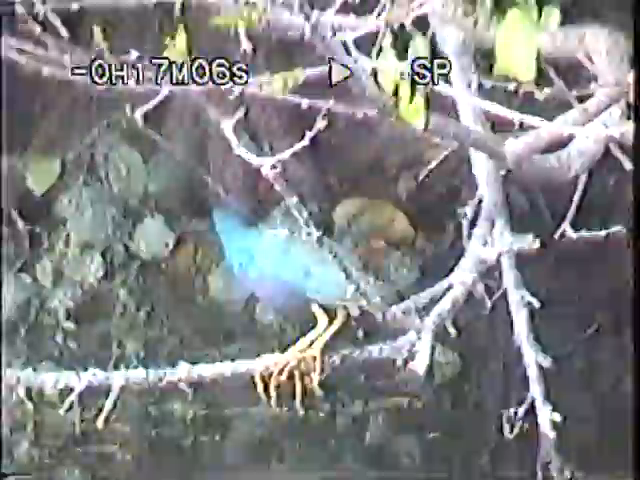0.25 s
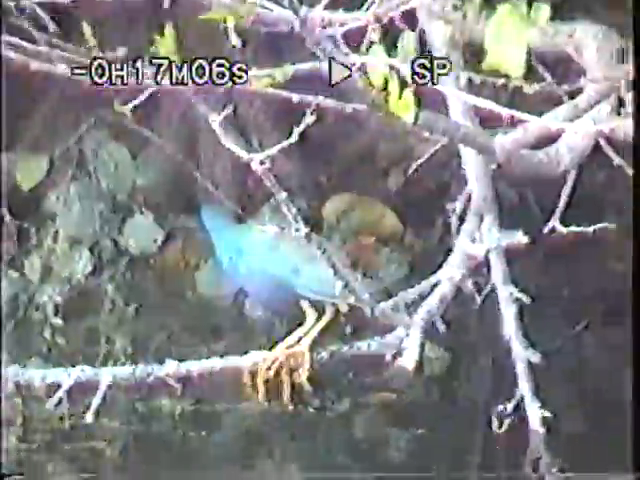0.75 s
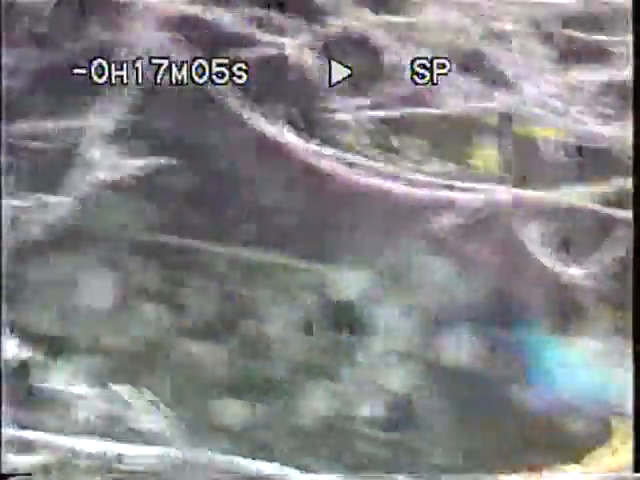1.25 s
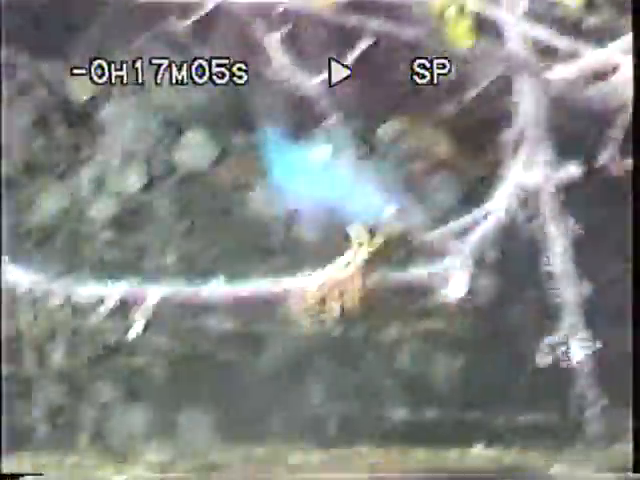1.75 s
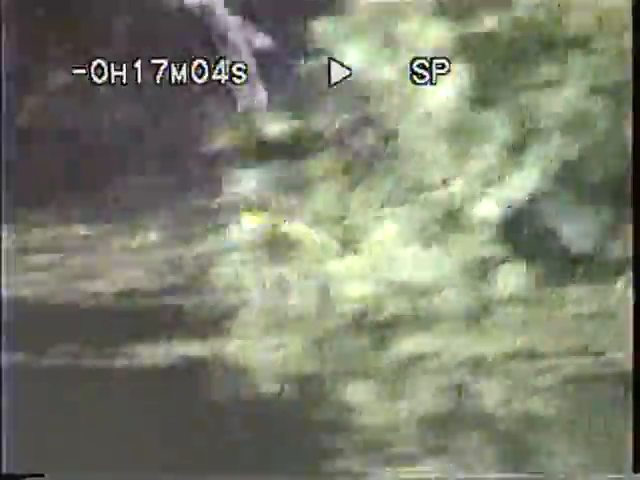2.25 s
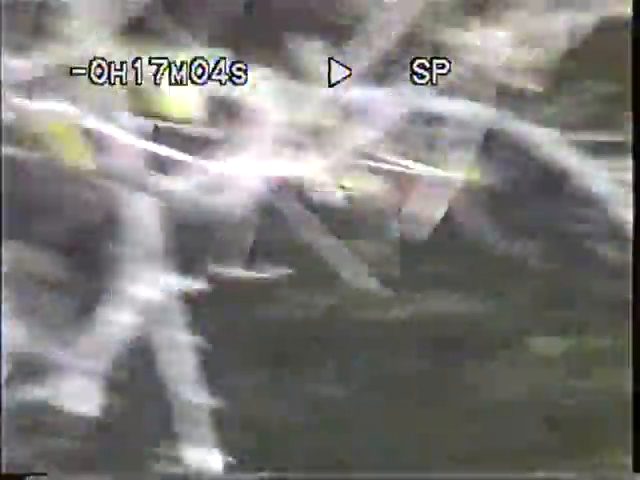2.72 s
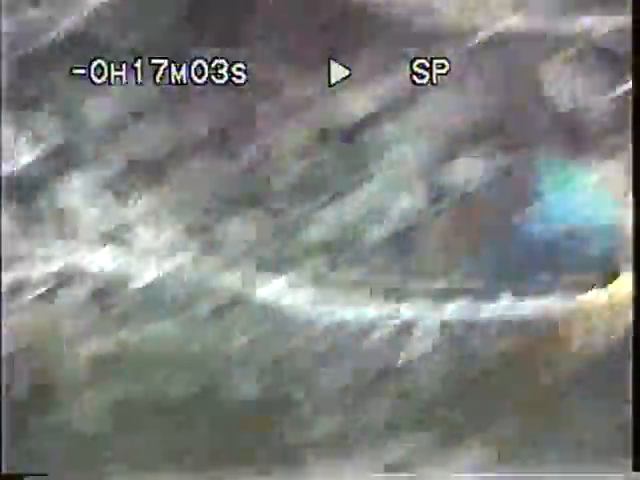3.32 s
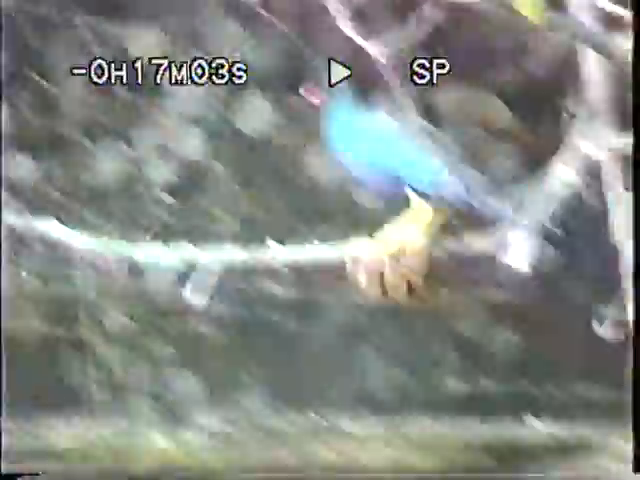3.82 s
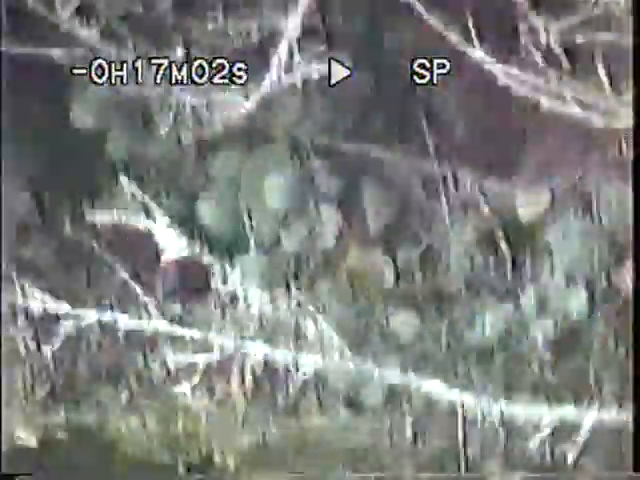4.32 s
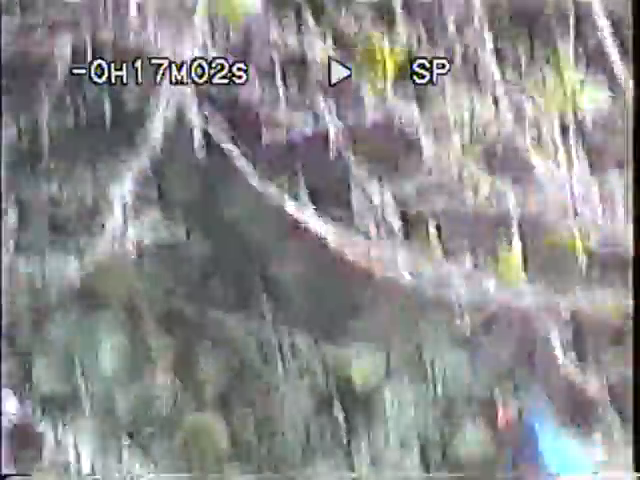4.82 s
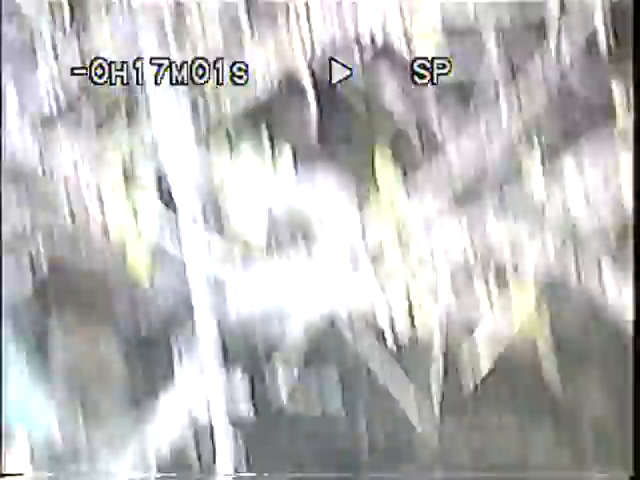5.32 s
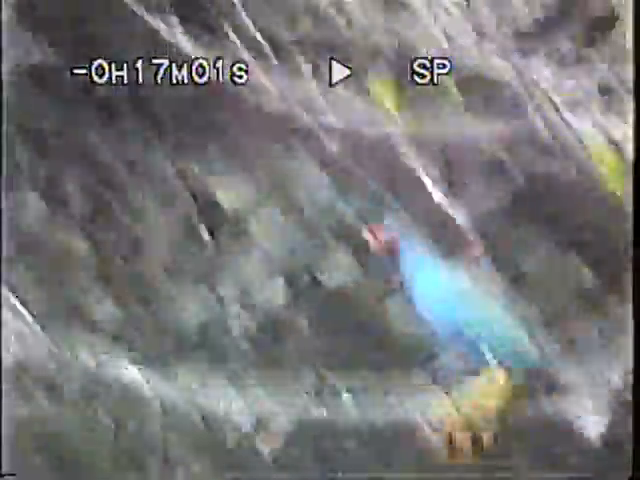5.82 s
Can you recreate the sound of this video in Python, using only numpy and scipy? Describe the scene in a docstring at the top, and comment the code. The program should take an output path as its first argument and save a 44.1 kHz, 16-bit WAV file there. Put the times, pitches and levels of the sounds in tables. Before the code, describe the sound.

Outdoors by a wooded bank, a marsh bird fires eight sharp, raspy chips about four a second, growing louder. After a short gap with low wind thumps, slower clear notes hook downward at the end, a few dry twig ticks around them. Thin falling whistles and faint peeps finish over steady soft hiss. Echoes trail each call; a camcorder microphone puts nearly everything in the left channel.

```python
"""A run of sharp two-voiced notes from a purple gallinule on a branch over water opens over steady outdoor hiss.
Each is two syrinx tones modulating each other; slower hooked notes and thin falling whistles are gliding harmonics.
Faint peeps are short tones, twig ticks are resonant noise bursts, and a wooded bank echoes them all with a noise tail.
Wind puffs are coloured noise that swells and fades; nearly all the sound is in the left channel."""
import sys
import numpy as np
from scipy import signal
from scipy.fft import rfft, irfft, next_fast_len
from scipy.io import wavfile
from scipy.ndimage import map_coordinates

SR = 44100
rng = np.random.default_rng(int(sys.argv[2]) if len(sys.argv) > 2 else 0)


def waveform_to_disk(signal):
    """Save audio, clipped to [-1, 1], as 16-bit WAV at the path in sys.argv[1]."""
    frames = np.transpose(np.atleast_2d(signal))
    scaled = np.clip(frames, -1, 1) * 32767
    samples = np.round(scaled).astype(np.int16)
    wavfile.write(sys.argv[1], SR, samples)


N = 267466  # length [samples]
LEAD = SR // 4  # room before time zero [samples]

# Levels throughout are relative, ahead of the channel gains in scene().
# Upper voice of a sharp note, before its pitch and length factors:
# (time from the accent [s], frequency [Hz], level [dB])
SHARP_UPPER = [(-.060, 3200, -26), (-.053, 3800, -16), (-.037, 3880, -11), (-.029, 4170, -8),
               (-.016, 3150, -11), (-.008, 3270, -7.5), (-.004, 2800, -12), (.001, 2660, 0),
               (.012, 2460, -5), (.019, 2250, -22)]


def amp(db):
    """Logarithmic level: decibels become an amplitude ratio."""
    return 10 ** (np.asarray(db) / 20)


def unit(x):
    """Power normalisation: scale to rms 1."""
    return x / np.sqrt(np.mean(x ** 2) + 1e-20)


def joined(rows, at):
    """Linear interpolation: each later column of a table, read along the first."""
    knots, *columns = np.transpose(rows)
    return [np.interp(at, knots, column) for column in columns]


def wobble(rate, size):
    """Band-limited randomness: a smooth curve through random knots, rate of them a second."""
    knots = rng.standard_normal(int(size * rate / SR) + 4)
    return map_coordinates(knots, [np.arange(size) * rate / SR])


def filtered(x, response):
    """Linear filtering: the spectrum is multiplied by a response of frequency."""
    size = x.shape[-1]
    padded = next_fast_len(size + 8192)
    spectrum = rfft(x, padded) * response(np.fft.rfftfreq(padded, 1 / SR))
    return irfft(spectrum, padded)[..., :size]


def coloured(x, points):
    """Spectral shaping: gains (frequency [Hz], level [dB]) joined along log frequency."""
    knots_hz, db = np.transpose(points)
    return filtered(x, lambda hz: amp(np.interp(np.log(hz + 1), np.log(knots_hz), db)))


def add(track, s, sound):
    """Superposition: mix a sound at s seconds into a track that begins LEAD samples before time zero."""
    part = track[LEAD + round(s * SR):][:len(sound)]
    part += sound[:len(part)]


def outdoors(direct, sent):
    """Reflection and scattering: direct sound plus a bank echo, strongest about a tenth of a second later."""
    # Scattered echo of the branches and bank: (delay [s], level before normalising [dB])
    bank_tail = [(0, -44), (.008, -3.5), (.03, -6), (.075, -3.5), (.102, -3), (.13, -2.5), (.17, -10),
                 (.25, -13.5), (.5, -19.5), (.9, -44.5)]
    # Colour of the echo: (frequency [Hz], level [dB])
    bank_colour = [(1000, -15.5), (2600, -0.5), (4000, 1), (5700, 5), (8500, 3.5), (10000, 2.5), (13000, 1)]
    t = np.arange(SR) / SR
    tail = unit(amp(joined(bank_tail, t)[0]) * rng.standard_normal(SR)) / np.sqrt(SR)
    tail[round(.104 * SR)] += amp(-10.5)  # the bank's face returns one clear copy
    echo = signal.fftconvolve(coloured(sent, bank_colour), tail)[:len(sent)]
    return (direct + amp(-0.5) * echo)[LEAD:]


def voice(hz, jitter, rate):
    """Phase accumulation: a syrinx membrane whose frequency trembles randomly."""
    trembling_hz = hz * (1 + jitter * wobble(rate, len(hz)))
    return 2 * np.pi * np.cumsum(trembling_hz) / SR


def sharp_note(pitch, length, rasp_db):
    """Nonlinear coupling: both syrinx sides sound and form sum tones, then the upper falls to a purer accent."""
    # Time from the accent before stretching by length; the settings below are on this clock too
    t = np.arange(SHARP_UPPER[0][0], SHARP_UPPER[-1][0], 1 / (SR * length))
    rasp = np.clip(-t / 0.0041, 0, 1)  # the strained part before the accent

    upper_hz, upper_db = joined(SHARP_UPPER, t)
    upper_phase = voice(pitch * upper_hz, jitter=0.02841, rate=420)
    upper_gain = amp(upper_db + rasp * rasp_db + 2.75 * wobble(284.6, len(t)))

    # The lower voice warbles about one pitch: 52 swings a second
    lower_hz = 2405 * (1 + 0.0666 * np.cos(2 * np.pi * 52 * t))
    lower_phase = voice(pitch * lower_hz, jitter=0.0406, rate=429.2)
    hold_start, hold_end = -0.0378, -0.0165  # [s]
    rise, fall = 700, 800  # [dB/s]
    lower_db = -12 - rise * np.maximum(hold_start - t, 0) - fall * np.maximum(t - hold_end, 0)
    lower_gain = amp(lower_db + rasp * rasp_db + 4.07 * wobble(277.4, len(t)))

    overtones = amp(-22.5 + 9.33 * rasp) * np.sin(2 * upper_phase)
    overtones += amp(-42.5 + 19.95 * rasp) * np.sin(3 * upper_phase)
    overtones += amp(-49.5) * np.sin(4 * upper_phase)
    sum_tones = amp(-12) * np.sin(upper_phase + lower_phase)
    sum_tones += amp(-17.5) * np.sin(2 * lower_phase)  # the lower voice's own octave
    sum_tones += amp(-22.5) * np.sin(2 * upper_phase + lower_phase)
    hiss_colour = [(1600, 3.5), (2300, 9.5), (3100, 20), (4200, -13.5), (9000, -7.5), (14000, -20.5)]
    hiss = unit(coloured(rng.standard_normal(len(t)), hiss_colour))
    upper = upper_gain * (np.sin(upper_phase) + overtones + amp(-18 + 8.68 * rasp) * hiss)
    return upper + lower_gain * (np.sin(lower_phase) + sum_tones)


def sharp_run():
    """Scattering: branches smear each note of the fast run; its echo keeps its strength as the direct sound grows."""
    # Sharp notes: (time of the accent [s], level [dB], pitch factor, length factor, rasp [dB])
    sharp_table = [(-.045, -25, 0.981, 0.814, -2), (.236, -21, 0.966, 1.072, -2),
                   (.502, -20.5, 0.974, 1.097, -1), (0.783, -21, 0.977, 1.119, -1),
                   (1.039, -19.5, 0.9834, 1.061, 0.5), (1.318, -18.5, 1.01, 1.01, -1.5),
                   (1.592, -15, 0.9794, 1.027, -2), (1.918, -14.5, 0.984, 1.071, -2.5)]
    # Colour of the throat: (frequency [Hz], level [dB])
    throat = [(1800, -5), (2600, -3.5), (3900, -7.5), (5200, -1), (5900, -14), (6600, 1.5), (7300, -4.5),
              (8300, -3.5), (10000, -0.5), (11300, -17), (13000, 3.5)]
    direct, sent = np.zeros((2, LEAD + N))
    t = np.arange(SR // 25) / SR
    smear = np.minimum(t / 0.00164, 1) * amp(-60 * t / 0.288)  # quick rise, then decay
    for accent_s, db, pitch, length, rasp_db in sharp_table:
        note = sharp_note(pitch, length, rasp_db)
        start = accent_s + SHARP_UPPER[0][0] * length
        branches = unit(smear * rng.standard_normal(len(t))) / np.sqrt(len(t))
        add(direct, start, amp(db) * note)
        add(direct, start, amp(db - 6) * signal.fftconvolve(note, branches))
        add(sent, start, amp(-22.5) * note)
    return outdoors(coloured(direct, throat), coloured(sent, throat))


def wind():
    """Turbulent pressure: lumpy puffs on the microphone over a light breeze; harder ones take a second spectrum."""
    # Wind puffs: (time of the crest [s], level [dB], length [s])
    puffs = [(.47, -36, 0.101), (0.606, -37.5, 0.122), (0.746, -38.5, 0.055), (0.905, -33.5, 0.156),
             (1.126, -42.5, 0.098), (1.362, -37.5, 0.128), (1.592, -35, 0.1114), (2.042, -41.5, 0.095),
             (2.15, -32, 0.0514), (2.417, -38.5, 0.077), (2.57, -30, 0.086), (2.654, -30, 0.0438),
             (2.724, -25, 0.0747), (2.906, -32.5, 0.0637), (3.022, -42, 0.18), (5.576, -47.5, 0.18),
             (5.953, -43.5, 0.085)]
    # Spectrum of light puffs: (frequency [Hz], level per Hz [dB])
    light_colour = [(15, -45.5), (25, -8.5), (92, 2), (210, -9), (382, -31), (600, -31), (780, -58),
                    (1320, -120)]
    # Spectrum of the hardest puff: (frequency [Hz], level per Hz [dB])
    hard_colour = [(15, -49), (25, -22.5), (54, -11.5), (160, 0.5), (200, -1), (233, 3.5), (700, -29),
                   (910, -30), (1540, -120)]
    edge_db, sharpness, breeze_db = 5.5, 1.47, -54  # drop half a length from the crest; flank power; floor
    t = np.arange(N) / SR
    swells = [db - edge_db * np.abs(2 * (t - s) / length) ** sharpness for s, db, length in puffs]
    level_db = np.maximum(np.max(swells, axis=0), breeze_db)
    force = np.clip((level_db + 35.5) / 10, 0, 1)  # 0 light, 1 hard
    light = unit(coloured(rng.standard_normal(N), light_colour))
    hard = unit(coloured(rng.standard_normal(N), hard_colour))
    lumps = unit(amp(2.02 * wobble(45, N)))
    return amp(level_db) * lumps * (np.sqrt(1 - force) * light + np.sqrt(force) * hard)


def air():
    """Stationary noise: the steady hiss of the wetland, gently swaying."""
    # Spectrum of the hiss: (frequency [Hz], level per Hz before normalising [dB])
    air_colour = [(15, -34), (25, -10.5), (118, -3), (201, 0), (230, 1), (527, -2.5), (602, -2), (975, -1),
                  (2290, -9.5), (2770, -9.5), (3430, -9), (4240, -12), (6870, -19.5), (13000, -30.5),
                  (14900, -28)]
    return amp(-44.5 + 0.4 * wobble(2.993, N)) * unit(coloured(rng.standard_normal(N), air_colour))


def slur(shape, overtones, length, hz, bright_db, jitter, flutter_db, pace=1):
    """Harmonic synthesis: a clear gliding note whose weak overtones grow as the voice settles."""
    u = np.linspace(0, 1, int(length * SR))  # share of the length
    pitch, db = joined(shape, u ** pace)
    phase = voice(hz * pitch, jitter, rate=415.6)
    settle_db = np.interp(u, [0, .2], [-9, 0])
    upper = sum(amp(level + 2.5 * wobble(60.8, len(u))) * np.sin(k * phase) for k, level in overtones)
    gain = amp(db + flutter_db * wobble(141.9, len(u)))
    return gain * (np.sin(phase) + amp(bright_db + settle_db) * upper)


def peeps():
    """Simple tones: soft, nearly level peeps from far across the marsh, without overtones."""
    # Distant peeps: (time [s], level [dB], reference pitch [Hz])
    peep_table = [(2.419, -42, 2744), (2.575, -41.5, 2735), (4.991, -41, 2766), (5.14, -43.5, 2720),
                  (5.959, -41.5, 2680)]
    # One peep: (share of its length, pitch factor, level [dB])
    peep_shape = [(0, 1.03, -14), (.5, 1, 2), (1, .97, -22.5)]
    track = np.zeros(LEAD + N)
    for s, db, hz in peep_table:
        note = slur(peep_shape, [], 0.0611, hz, 0, jitter=0.0227, flutter_db=-2.0)
        add(track, s, amp(db) * note)
    return outdoors(track, amp(-6.5) * track)


def hooked_notes():
    """Frequency glide: slower clear notes level off and drop at the end; the bank hears all about equally."""
    # Hooked notes: (time [s], length [s], level [dB], plateau pitch [Hz], overtone level [dB],
    # glide pace: 1 even, less settles sooner)
    hooked_table = [(2.657, 0.107, -25, 2881, 0.5, 0.851), (2.927, 0.1205, -24, 2844, -1.5, 0.953),
                    (3.195, 0.1114, -25, 2766, -.5, 1.005), (3.438, 0.1174, -23, 2744, -3, 1.138),
                    (3.71, .12, -21.5, 2778, 0, 1.1), (3.969, 0.1137, -23.5, 2745, -3, 0.977),
                    (4.273, 0.1027, -32.5, 2788, 2, 0.9)]
    # One hooked note: (share of its length, pitch factor, level [dB])
    hook_shape = [(0, 1.27, -22), (.13, 1.155, -11), (.3, 1.06, -5), (.48, 1.014, -2), (.66, .998, 0),
                  (.87, 1.0, 0), (.94, .95, -2), (1, .83, -11)]
    # Overtones, the halves from a slight rasp: (multiple of the pitch, level [dB])
    hook_overtones = [(1.5, -35), (2, -28.5), (2.5, -40), (3, -28.5), (4, -55)]
    # Colour of the throat: (frequency [Hz], level [dB])
    throat = [(2800, -2), (3500, 3.5), (5200, 4.5), (5900, 9), (6600, 12), (8400, -4), (9200, 8),
              (10000, -10.5), (14000, -12.5)]
    sent_colour = [(2700, 0.5), (3200, 7.5), (5600, -6.5), (8400, 5.5), (10000, 5.0)]
    direct, sent = np.zeros((2, LEAD + N))
    for s, length, db, hz, bright_db, pace in hooked_table:
        note = slur(hook_shape, hook_overtones, length, hz, bright_db, jitter=0.0048, flutter_db=1.44, pace=pace)
        add(direct, s, amp(db) * note)
        add(sent, s, amp(-35.5) * note)
    return outdoors(coloured(direct, throat), coloured(sent, sent_colour))


def twigs():
    """Damped resonance: short dry ticks, each a decaying noise burst in one broad resonance."""
    # Twig ticks: (time [s], level [dB], resonance [Hz], decay by 60 dB [s])
    tick_table = [(2.666, -35, 1100, 0.083), (2.681, -25, 1010, 0.0353), (4.341, -24, 1910, 0.0153),
                  (5.117, -31.5, 1330, 0.0373)]
    # Colour of the ticks: (frequency [Hz], level [dB])
    tick_colour = [(300, -2), (900, 5), (2400, -3.5), (4000, -1.5), (12000, -15)]
    track, t = np.zeros(LEAD + N), np.arange(SR // 10) / SR
    for s, db, centre, t60 in tick_table:
        noise = rng.standard_normal(len(t))
        burst = filtered(noise, lambda hz: hz / (centre ** 2 - hz ** 2 + .8j * hz * centre))
        add(track, s, amp(db - 60 * t / t60) * unit(coloured(burst, tick_colour)))
    return outdoors(track, amp(-15.0) * track)


def whistles():
    """Falling frequency: thin wavering whistles from farther inside the bushes."""
    # Whistles: (time [s], length [s], level [dB], reference pitch [Hz], overtone level [dB], echo level [dB])
    whistle_table = [(3.073, 0.0874, -36, 4882, -6.5, 0.5), (3.446, 0.086, -39.5, 4720, -5, 4.5),
                     (4.132, 0.085, -45, 4337, 1.5, 2), (4.383, 0.079, -43.5, 4345, -5, -2),
                     (4.661, .1, -44, 4308, -21, -5), (4.884, 0.019, -36.5, 5136, -8.5, -4.5),
                     (4.951, 0.0988, -28.5, 4901, -2.5, -6.5), (5.443, 0.0908, -23, 4778, -12.5, -13.5)]
    # One whistle: (share of its length, pitch factor, level [dB])
    whistle_shape = [(0, 1.25, -25.5), (.14, 1.13, -10.5), (.32, 1.05, -3.5), (.6, .97, -8.5),
                     (.88, .85, -9.5), (1, .76, -14)]
    # Overtones: (multiple of the pitch, level [dB])
    whistle_overtones = [(2, -16)]
    direct, sent = np.zeros((2, LEAD + N))
    for s, length, db, hz, bright_db, echo_db in whistle_table:
        note = slur(whistle_shape, whistle_overtones, length, hz, bright_db, jitter=0.01374, flutter_db=0.0)
        add(direct, s, amp(db) * note)
        add(sent, s - .025, amp(echo_db + db) * note)  # closer to the bank, so the echo comes sooner
    return outdoors(direct, sent)


def scene():
    """Superposition: one microphone feeds the left channel; the right holds a trace of it and faint hiss."""
    mic = sharp_run() + wind() + air() + peeps() + hooked_notes() + twigs() + whistles()
    hiss_colour = [(25, 1.5), (120, 12), (300, 6.5), (1000, -5), (2600, -14), (6000, -19.5), (14000, -31.0)]
    hiss = unit(coloured(rng.standard_normal(N), hiss_colour))
    return np.array([amp(6) * mic, amp(-43.5) * mic + amp(-59.5) * hiss])


def record(dry):
    """Band limiting: nothing at or above 14300 Hz passes."""
    return filtered(dry, lambda hz: hz < 14300)


dry = scene()
out = record(dry)
waveform_to_disk(out)
```